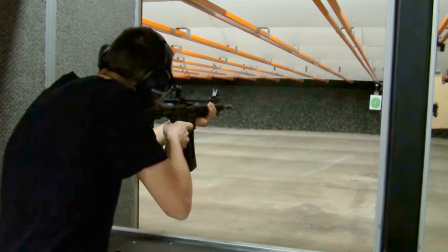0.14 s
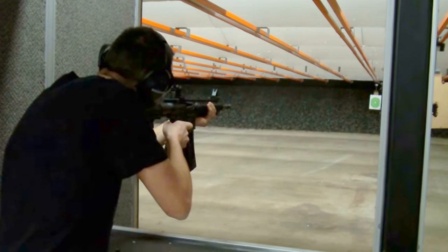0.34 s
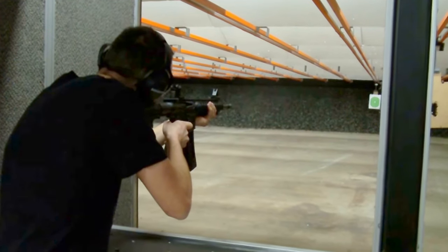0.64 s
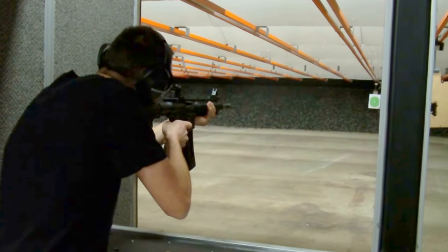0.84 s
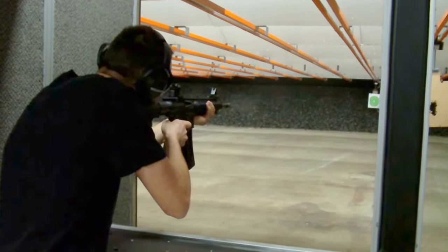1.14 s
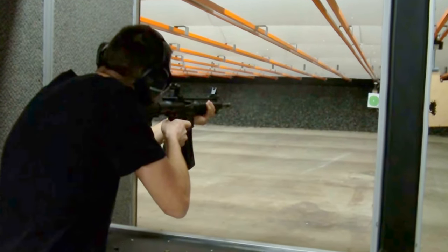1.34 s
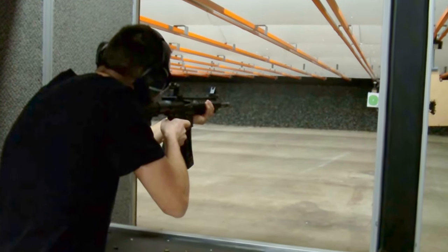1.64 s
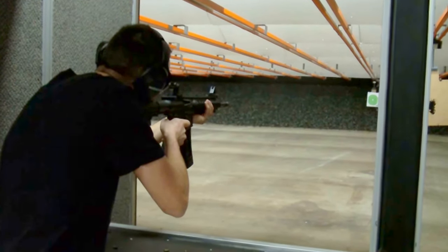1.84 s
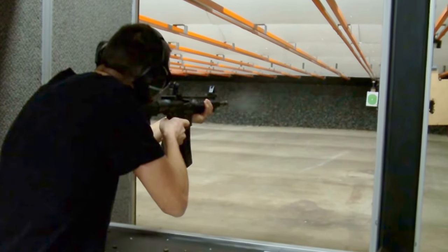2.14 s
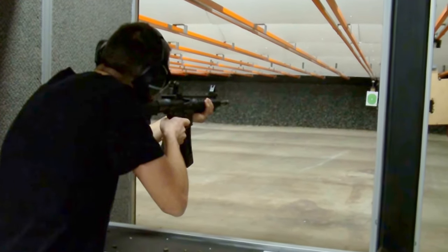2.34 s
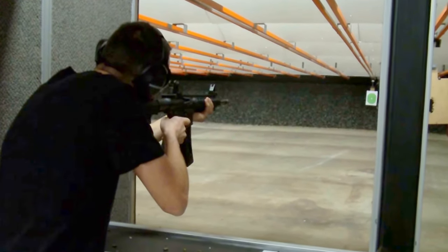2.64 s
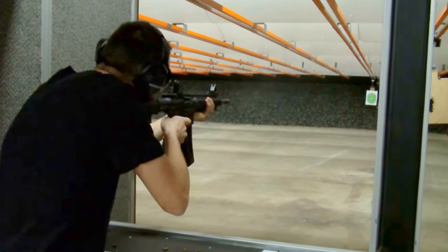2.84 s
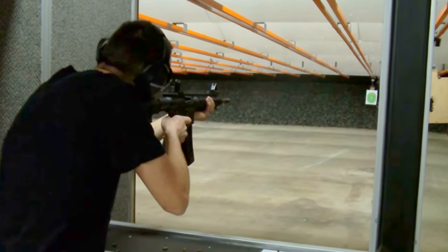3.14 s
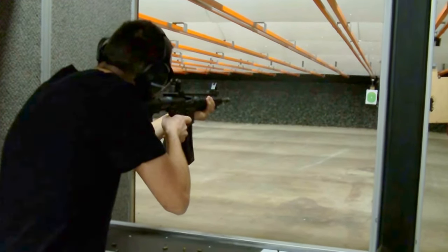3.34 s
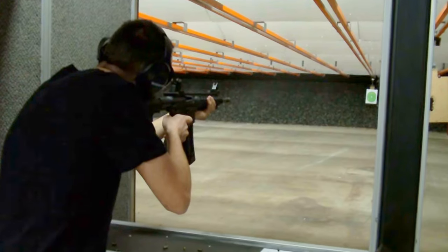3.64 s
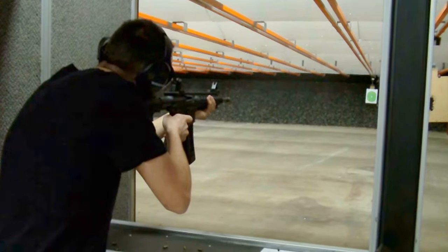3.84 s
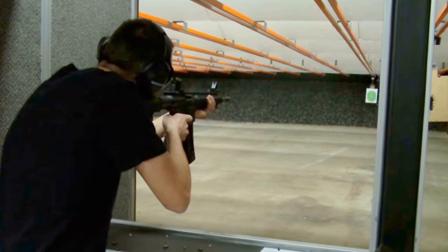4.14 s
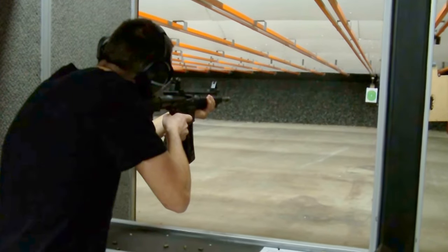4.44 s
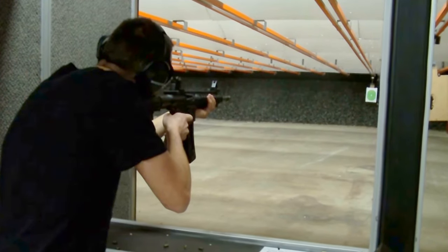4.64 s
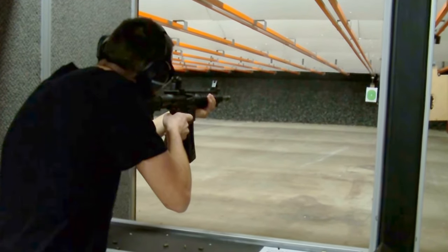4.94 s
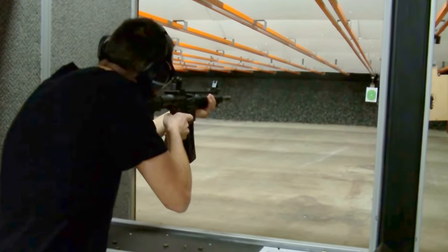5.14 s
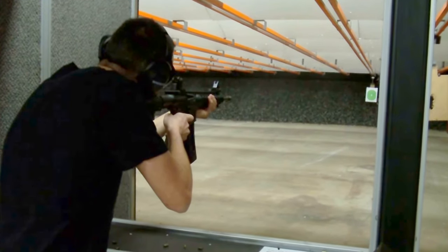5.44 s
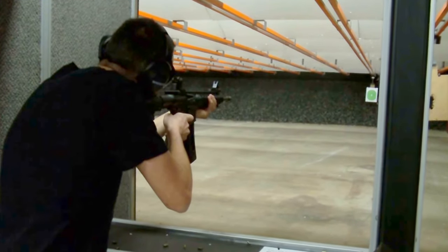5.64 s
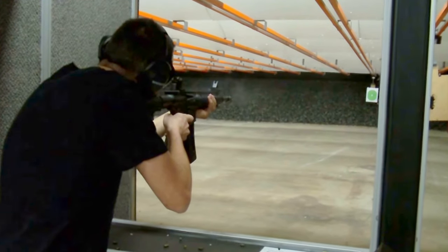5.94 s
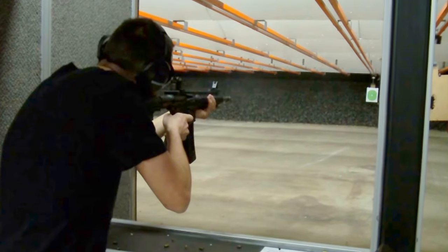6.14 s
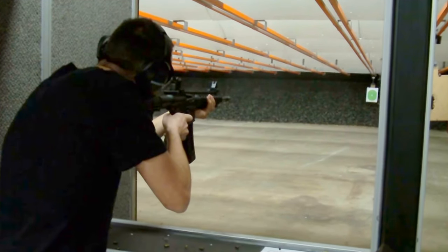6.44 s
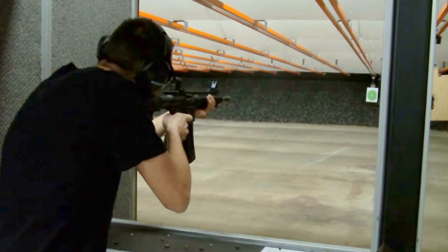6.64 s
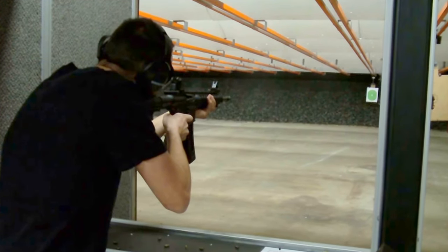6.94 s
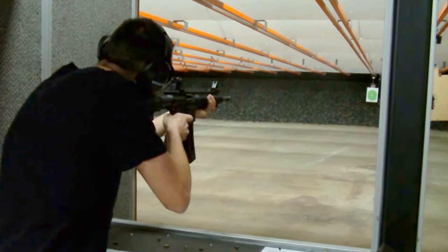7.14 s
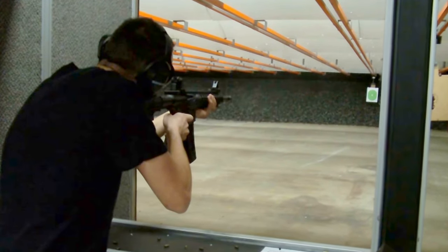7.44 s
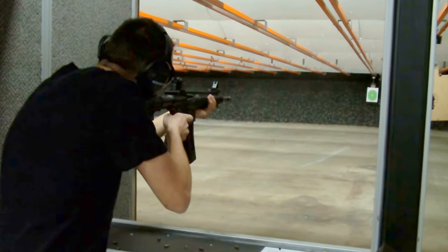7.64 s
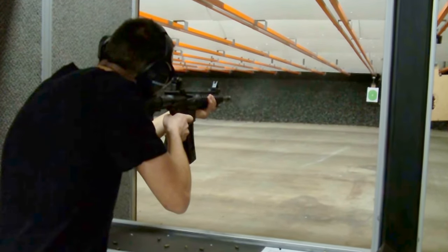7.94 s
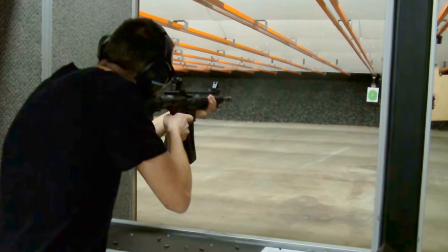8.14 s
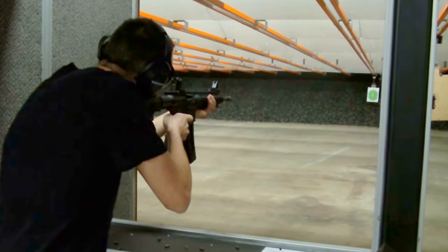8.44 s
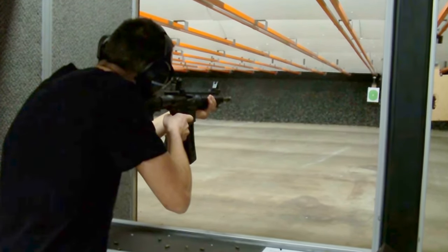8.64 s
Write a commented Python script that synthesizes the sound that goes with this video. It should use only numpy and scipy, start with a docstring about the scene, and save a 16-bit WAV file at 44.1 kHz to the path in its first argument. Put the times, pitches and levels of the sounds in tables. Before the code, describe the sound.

A small-calibre rifle fires steady single shots in an indoor range, each sharp crack rattling the booth, slapping the backstop and rolling down the hall.

```python
"""Indoor rifle range

A small-calibre rifle fires steady single shots from a booth: shaped noise bursts crack, rattle and roll
down the hall. An eighth of a second later a short burst and bright echoes slap the backstop.
One dry double clack sounds among the shots, and a heavier gun in another lane booms as dull, swelling noise.
Trigger ticks, louder clicks, a sagging squeak tone, and ventilation of noise and drone fill the gaps."""
import sys
import numpy as np
from scipy import signal
from scipy.fft import rfft, irfft, next_fast_len
from scipy.io import wavfile
from scipy.ndimage import uniform_filter1d

SR = 44100
rng = np.random.default_rng(int(sys.argv[2]) if len(sys.argv) > 2 else 0)


def generate_wav(signal):
    """Clip the signal to [-1, 1] and save it as 16-bit WAV at the path in sys.argv[1]."""
    frames = np.transpose(np.atleast_2d(signal))
    scaled = np.clip(frames, -1, 1) * 32767
    pcm = np.round(scaled).astype(np.int16)
    wavfile.write(sys.argv[1], SR, pcm)


N = 387198
TOP_HZ = 10600  # upper edge of the sound
T = np.arange(int(1.1 * SR)) / SR  # time within one event, s


def amp(db):
    """Decibels to gain."""
    return np.exp(np.maximum(db, -200) * np.log(10) / 20)


def unit(x):
    """Scale x to an rms of 1."""
    return x / np.sqrt(np.mean(x ** 2) + 1e-20)


def along(points, hz):
    """Read (frequency, value) points on a log frequency axis."""
    f, v = np.transpose(points)
    return np.interp(np.log(hz + 1), np.log(f + 1), v)


def filtered(x, response):
    """Multiply the spectrum of x by a response of frequency."""
    n = x.shape[-1]
    m = next_fast_len(n + 8192)  # room for the filter's ringing
    return irfft(rfft(x, m) * response(np.fft.rfftfreq(m, 1 / SR)), m)[..., :n]


def coloured(x, spectrum, tilt_db=0, size=2048):
    """Causal filter with this spectral shape, tilted in dB per octave; its power gain below TOP_HZ, averaged
    over the whole band up to half the sample rate, is 1 (about 2, or +3 dB, below TOP_HZ itself)."""
    hz = np.fft.rfftfreq(size, 1 / SR)
    octaves = np.log2(hz / 2000 + .1)  # the offset levels the tilt off in the bass
    gain = amp(along(spectrum, hz) + tilt_db * octaves)
    gain = gain / np.sqrt(np.mean(gain ** 2 * (hz < TOP_HZ)))
    # folding the cepstrum gives minimum phase, so attacks stay sharp
    cepstrum = irfft(np.log(gain))
    cepstrum[1:size // 2] *= 2
    cepstrum[size // 2 + 1:] = 0
    impulse = irfft(np.exp(rfft(cepstrum)))
    return signal.oaconvolve(x, impulse)[:len(x)]


def add(track, s, sound):
    """Mix a sound into the track at time s, trimmed at both ends of the track."""
    start = round(s * SR)
    part = sound[max(-start, 0):max(N - start, 0)]
    track[max(start, 0):][:len(part)] += part


def noise():
    """White noise as long as one event."""
    return rng.standard_normal(len(T))


def dying(t60, delay=0):
    """Exponential decay that falls 60 dB in t60 seconds and starts after a delay."""
    return amp(-60 * np.maximum(T - delay, 0) / t60) * (T >= delay)


def burst(envelope, count=5, size=2048):
    """A short cluster of pressure spikes with a nearly even spectrum under this envelope."""
    shape = envelope[:size]
    x = rng.standard_normal(size) * shape
    # flatten the spectrum and re-shape the envelope in turn
    for _ in range(count):
        flat = irfft(np.exp(1j * np.angle(rfft(x))))
        x = flat * np.sqrt(shape)
    x = x * np.linalg.norm(shape) / np.linalg.norm(x)
    return np.pad(x, (0, len(T) - size))


def reflections(spread_db):
    """Dense echoes whose strength wavers at random."""
    strength = amp(spread_db * unit(uniform_filter1d(noise(), size=48)))
    return unit(noise() * strength)


# Reverberation time of the hall: frequency_hz [Hz], t60_s [s]
HALL_DECAY = [(100, 1), (400, 1.28), (900, 1.334), (1800, 0.85), (3500, 0.8), (6000, 0.52), (10000, 0.33)]


def hall_tail(size=256):
    """Diffuse echoes: each frequency dies at its own speed."""
    hop = size // 2
    t = np.arange(len(T) // hop + 2) * hop / SR
    t60 = along(HALL_DECAY, np.fft.rfftfreq(size, 1 / SR))
    spectra = rfft(rng.standard_normal((len(t), size)))
    frames = irfft(spectra * amp(-60 * t[:, None] / t60))
    frames = frames * np.sin(np.pi * np.arange(size) / size)  # equal-power cross-fades
    return (frames[1:, :hop] + frames[:-1, hop:]).ravel()[:len(T)]


# Rattle of the booth's close walls, relative: frequency_hz [Hz], level_db [dB]
BOOTH_SPECTRUM = [(50, -30.5), (130, 11.5), (260, 15.5), (520, -1), (750, 4.5), (1000, -10.5), (1400, 2),
                  (2500, -10.5), (5000, -4), (10500, -10.5)]
# Roll of the hall, relative: frequency_hz [Hz], level_db [dB]
HALL_SPECTRUM = [(40, -52.5), (110, -14), (250, -3.5), (500, -0.5), (850, 1.5), (1500, 0.5), (2500, -1),
                 (3700, -3), (6000, -9), (10500, -9.5)]
# Echo cluster off the ceiling baffles, relative: frequency_hz [Hz], level_db [dB]
SWELL_SPECTRUM = [(60, -19.5), (200, -2.5), (350, -1.5), (750, 5), (950, -9.5), (1350, 8.5), (2000, -1),
                  (4000, -19.5), (10500, -23)]


def blast_paths():
    """One pattern of paths from muzzle to microphone: the near crack, and the echoes of booth and hall."""
    front = np.exp(-((T - .0037) / 0.00053) ** 2)
    crack = burst(front + 0.49 * dying(0.033, delay=0.0042))
    # a weak first arrival leads the main crack, and a partition throws it back once
    first_arrival = amp(-20.5) * burst(dying(0.005))
    thrown_back = amp(-7) * burst(dying(0.004, delay=0.012))
    crack = crack + first_arrival + thrown_back
    # the booth's close walls rattle, with a low thump
    booth = amp(-17.5) * coloured(burst(dying(0.068, delay=0.0039), size=4096), BOOTH_SPECTRUM)
    build_up = 1 - dying(0.092, delay=0.0045)
    tail = amp(-17.5) * coloured(hall_tail() * build_up, HALL_SPECTRUM)
    # ceiling baffles down the range return a cluster of echoes together
    cluster = np.exp(-((T - .055) / 0.037) ** 2)
    swell = amp(-20) * coloured(reflections(spread_db=3) * cluster, SWELL_SPECTRUM)
    return np.array([crack, booth + tail + swell])


def blend(same, fresh, change):
    """The muzzle barely moves: only a share of the echo pattern changes between shots; its energy stays."""
    mix = np.sqrt(1 - change) * same + np.sqrt(change) * fresh
    return mix * np.linalg.norm(same, axis=1, keepdims=True) / np.linalg.norm(mix, axis=1, keepdims=True)


# Rifle shots, levels relative: start_s [s], crack_db [dB], hall_db [dB],
# brightness_db [dB per octave], slap_db [dB, on the backstop], squeeze_s [s, from trigger tick to start]
SHOTS = [(0.0127, -7, -2.5, 0, -1, .12), (0.6475, -3.5, -1, -3, 3, 0.1),
         (1.3342, -1.5, 1.4, -1.5, -2.5, 0.081), (2.319, 2, 1.5, -1.5, 2, 0.17),
         (2.9291, -0.5, 1.5, 0.5, -8, 0.12), (3.71, -7.5, -2.5, 1.5, 0.5, 0.11),
         (4.6755, 1, 0, 0.5, 1, 0.074), (5.38, 0.5, 1.5, -2.5, -10, .132), (6.904, -3, 2, 1, -3, .125),
         (7.4874, -3, 1, 2.5, -4, 0.23), (8.0994, -3, -2, 0.5, -11, .12), (8.7006, -3.5, 2, 2.5, 3, 0.091)]
# The near crack, relative: frequency_hz [Hz], level_db [dB]
CRACK_SPECTRUM = [(40, -41), (150, -16.5), (380, -19.5), (700, -14.5), (1080, -33), (1700, 0.5),
                  (2300, -10.5), (3200, -7.5), (4600, 5.5), (6200, -6.5), (10500, -3)]


def rifle():
    """Every shot excites nearly the same paths, with its own strength and brightness."""
    out, usual = np.zeros(N), blast_paths()
    for s, crack_db, hall_db, bright_db, *_ in SHOTS:
        crack, echoes = blend(usual, blast_paths(), change=0.35)
        near = amp(crack_db - 4) * coloured(crack, CRACK_SPECTRUM, tilt_db=bright_db)
        add(out, s - .0025, near + amp(hall_db) * echoes)  # the first arrival leads
    return out


# The bullet's slap, relative: frequency_hz [Hz], level_db [dB]
SLAP_SPECTRUM = [(100, -35), (700, -23.5), (1200, -22.5), (1620, 2), (1980, -6), (2350, -5), (3200, -18.5),
                 (5000, -37), (10500, -30.5)]
# Bright scatter of the impact, relative: frequency_hz [Hz], level_db [dB]
SPRAY_SPECTRUM = [(200, -17.5), (800, -13), (1650, 5.5), (2600, 3.5), (4200, -2), (6000, -7.5),
                  (10500, -13)]
# the bullet flies down the range and the sound of its impact comes back
IMPACT_DELAY_S, CEILING_ECHO_DELAY_S = .128, .0094
SPRAY_DB = -28.5  # over the shot's hall level


def backstop():
    """The bullet's slap, its echo off the ceiling, and a bright spray that follows the shot's hall level."""
    out = np.zeros(N)
    for s, _, hall_db, _, slap_db, _ in SHOTS:
        hit = s + IMPACT_DELAY_S
        slap = amp(slap_db) * coloured(burst(dying(0.0019)), SLAP_SPECTRUM)
        add(out, hit, slap)
        add(out, hit + CEILING_ECHO_DELAY_S, amp(-10) * slap)
        spray = hall_tail() * (1 + 0.37 * dying(0.36))
        add(out, hit, amp(hall_db + SPRAY_DB) * coloured(spray, SPRAY_SPECTRUM))
    return out


# Two strokes of the dry report, levels relative: start_s [s], level_db [dB], t60_s [s], hall_db [dB]
CLACKS = [(6.0943, -1.5, 0.0165, -20.5), (6.0975, -16.5, 0.013, -28)]
# The dry report, relative: frequency_hz [Hz], level_db [dB]
DRY_REPORT_SPECTRUM = [(60, -18), (230, -14.5), (450, -13), (730, 2), (1020, -20.5), (1420, 3.5),
                       (2400, -9.5), (3000, 0.5), (3800, -4), (5000, -7), (7000, -16), (10500, -9)]


def dry_report():
    """A hard double clack of two short bursts that stirs the hall only a little."""
    out = np.zeros(N)
    for s, db, t60, hall_db in CLACKS:
        clack = coloured(burst(dying(t60)), DRY_REPORT_SPECTRUM)
        booth = amp(-24) * coloured(noise() * dying(0.32), BOOTH_SPECTRUM, tilt_db=2.5)
        hall = coloured(hall_tail() * dying(3.34), HALL_SPECTRUM, tilt_db=-1.2)
        add(out, s, amp(db) * (clack + booth) + amp(hall_db - 2.5) * hall)
    return out


# Shots of the heavier gun, level relative: start_s [s], level_db [dB]
BOOMS = [(-.02, 1), (3.483, 3), (7.568, -0.5)]
# The dull boom, relative: frequency_hz [Hz], level_db [dB]
BOOM_SPECTRUM = [(30, -20.5), (70, -21), (190, -8), (280, -3), (600, 0), (900, 0.5), (1400, -3),
                 (2200, -12.5), (4000, -23.5), (10500, -27.5)]


def heavy_gun():
    """Screened by the partitions, it arrives as a dull swelling boom with no crack."""
    out = np.zeros(N)
    rise = 1 - dying(.06)
    early_echoes = 1 + 0.79 * np.exp(-((T - .024) / 0.029) ** 2)
    for s, db in BOOMS:
        boom = coloured(hall_tail() * rise * early_echoes, BOOM_SPECTRUM)
        add(out, s, amp(db - 15) * boom)
    return out


# Louder clicks of the trigger's reset and of spent cases, level relative: start_s [s], level_db [dB]
CLICKS = [(1.1045, -39), (2.637, -32.5), (4.1653, -38.5), (4.4562, -36.5), (5.874, -40), (6.6434, -41.5),
          (7.3195, -27.5)]
# Light metal contact, relative: frequency_hz [Hz], level_db [dB]
CLICK_SPECTRUM = [(500, -21), (2000, -4), (4500, -13), (6500, -4.5), (10500, -9)]
TAKE_UP_DB = -42.5  # tick as the trigger's slack is taken up, on the scale of the clicks


def clicks():
    """Light metal contacts with a trace of the hall: ticks before each shot, and louder clicks between."""
    out, tail = np.zeros(N), hall_tail()
    take_ups = [(s - squeeze_s, TAKE_UP_DB) for s, *_, squeeze_s in SHOTS]
    for s, db in CLICKS + take_ups:
        contact = burst(dying(0.023)) + amp(-14) * tail
        add(out, s, amp(db - 10.5) * coloured(contact, CLICK_SPECTRUM))
    return out


SQUEAK_AT_S, SQUEAK_DB = 4.405, -61.5  # level around which the flutter moves
SQUEAK_ATTACK_S, SQUEAK_HOLD_S, SQUEAK_RELEASE_S = 0.065, .03, .12
SQUEAK_START_HZ, SQUEAK_REST_HZ, SQUEAK_SAG_S = 5100, 4180, 0.038


def squeak(flutter_db=4):
    """A thin friction tone with one overtone sags to a resting note; its pitch and level waver."""
    out = np.zeros(N)
    hz = SQUEAK_REST_HZ + (SQUEAK_START_HZ - SQUEAK_REST_HZ) * np.exp(-T / SQUEAK_SAG_S)
    corners = np.cumsum([0, SQUEAK_ATTACK_S, SQUEAK_HOLD_S, SQUEAK_RELEASE_S])
    envelope = np.interp(T, corners, [0, 1, 1, 0])
    waver = 1 + .008 * unit(uniform_filter1d(noise(), size=300))
    level = amp(SQUEAK_DB + flutter_db * unit(uniform_filter1d(noise(), size=400)))
    phase = 2 * np.pi * np.cumsum(hz * waver) / SR
    tone = np.sin(phase) + amp(-11) * np.sin(2 * phase)
    add(out, SQUEAK_AT_S, level * envelope * tone)
    return out


# Rushing air, relative: frequency_hz [Hz], level_db [dB]
AIR_SPECTRUM = [(20, -6.5), (40, -8), (60, -6.5), (90, -2.5), (140, 0.5), (200, -8), (500, -9.5),
                (1000, -11.5), (2000, -18), (4000, -27), (7000, -38.5), (10000, -56.5)]
# The fan's drone over time: time_s [s], level_db [dB]
DRONE_LEVEL = [(1, -49.5), (2.2, -44.5), (2.7, -50.5), (6, -47.5), (8.4, -53.5)]


def ventilation(drone_hz=137, width_hz=12, flutter=0.94):
    """Rushing air and a fan's drone: a sine plus narrow noise, which throbs in the turbulent duct."""
    t = np.arange(N) / SR
    air = unit(filtered(rng.standard_normal(N), lambda hz: amp(along(AIR_SPECTRUM, hz))))
    narrow = lambda hz: 1 / (1 + ((hz - drone_hz) / width_hz) ** 4)
    throb = unit(filtered(rng.standard_normal(N), narrow))
    drone = unit(np.sin(2 * np.pi * drone_hz * t) + flutter * throb)
    drone_gain = amp(np.interp(t, *np.transpose(DRONE_LEVEL)))
    return amp(-53) * air + drone_gain * drone


# Difference between the two microphone ports: frequency_hz [Hz], side_to_mid_db [dB]
PORT_WIDTH = [(60, -9.5), (130, -29), (400, -33.5), (1000, -43), (3000, -22), (9000, -15)]


def scene():
    """All sources reach two closely spaced ports almost alike."""
    mid = rifle() + backstop() + dry_report() + heavy_gun() + clicks() + squeak() + ventilation()
    # sideways reflections make the small difference between the ports
    scatter = burst(dying(.03, delay=.0008))
    side = signal.oaconvolve(mid, scatter / np.linalg.norm(scatter))[:N]
    side = filtered(side, lambda hz: amp(along(PORT_WIDTH, hz)))
    return np.array([mid + side, mid - side])


def record(dry):
    """Low cut below 42 Hz, narrow dip near 7.9 kHz, rounded peaks, steep treble cut."""
    notch = signal.butter(2, [7680, 8120], "bandstop", fs=SR, output="sos")
    low_cut = signal.butter(3, 42, "highpass", fs=SR, output="sos")
    band = lambda hz: 1 / (1 + np.clip(hz / TOP_HZ, .5, 2) ** 120)  # steep treble cut
    heard = filtered(signal.sosfilt(np.vstack([notch, low_cut]), dry), band)
    rounded = heard / (1 + np.abs(heard / .82) ** 6) ** (1 / 6)
    return filtered(rounded, band)


dry = scene()
out = record(dry)
generate_wav(out)
```